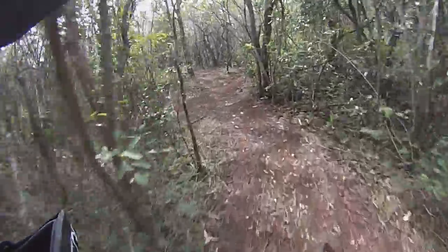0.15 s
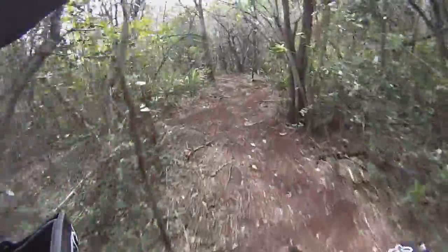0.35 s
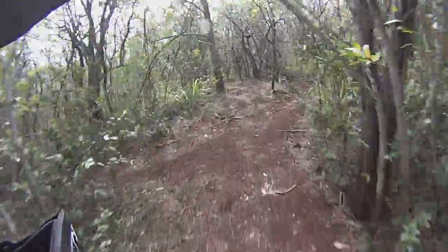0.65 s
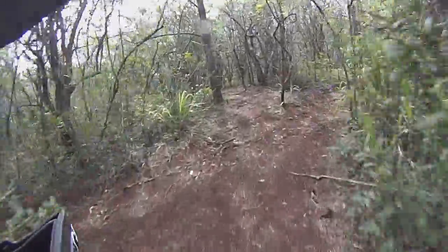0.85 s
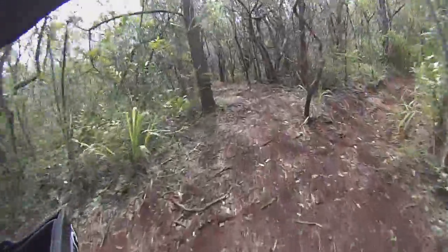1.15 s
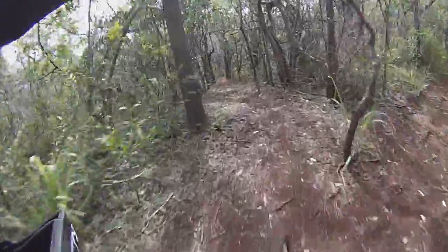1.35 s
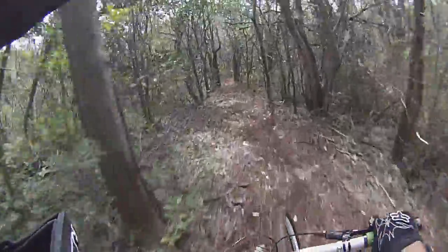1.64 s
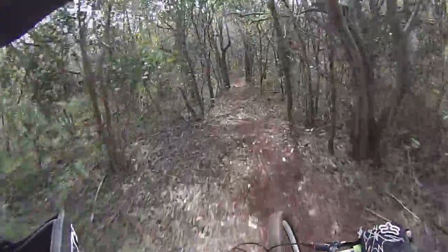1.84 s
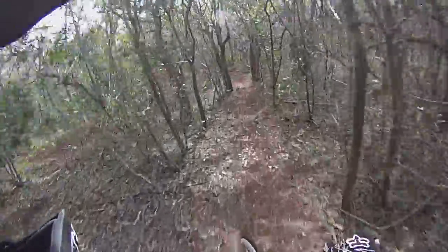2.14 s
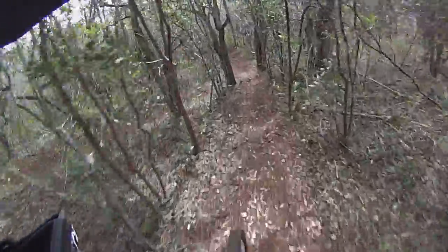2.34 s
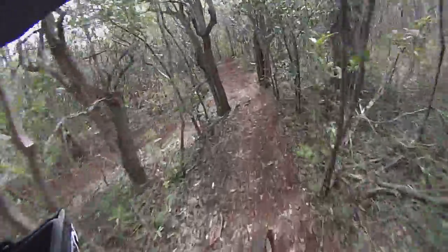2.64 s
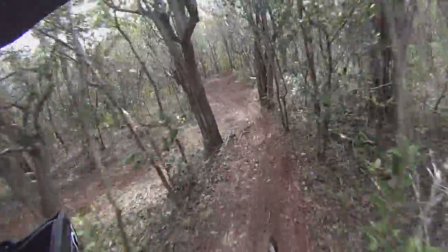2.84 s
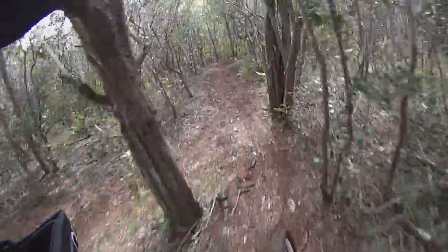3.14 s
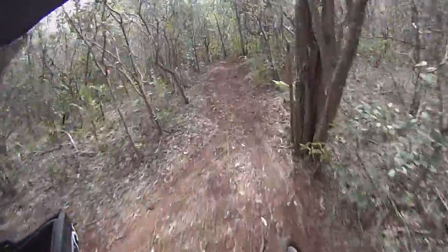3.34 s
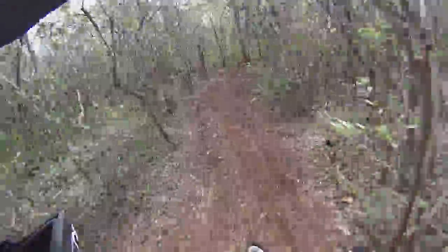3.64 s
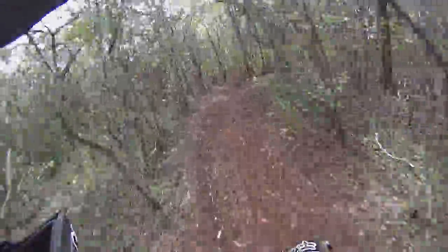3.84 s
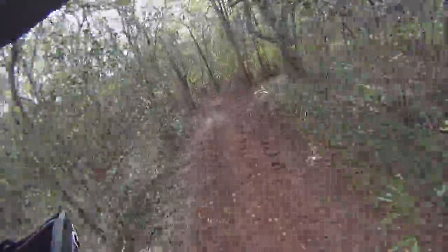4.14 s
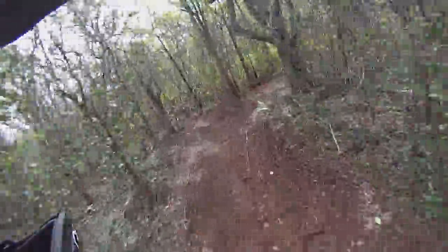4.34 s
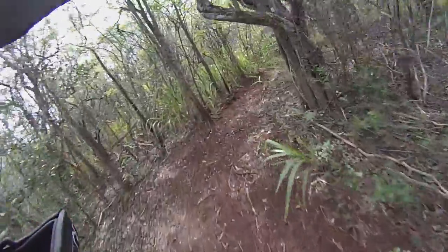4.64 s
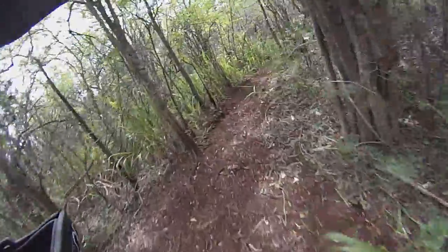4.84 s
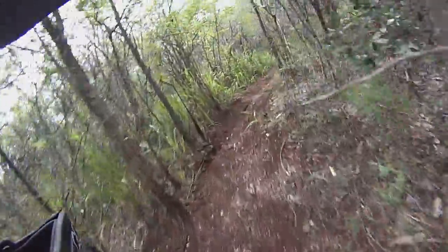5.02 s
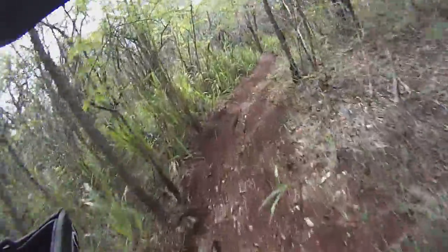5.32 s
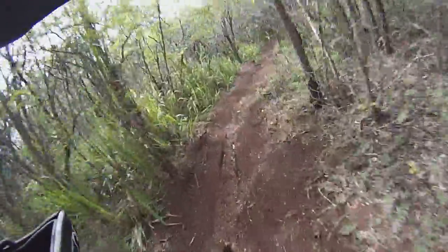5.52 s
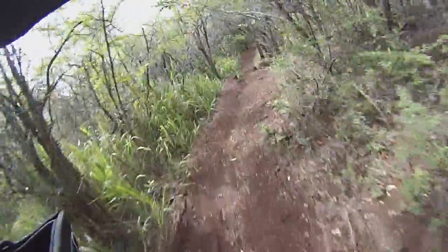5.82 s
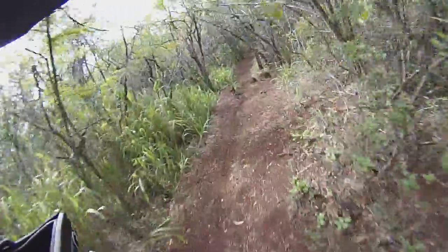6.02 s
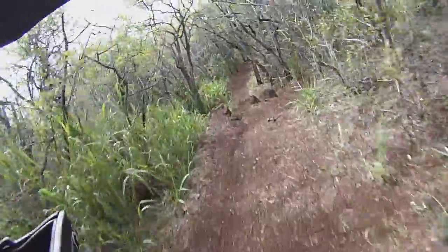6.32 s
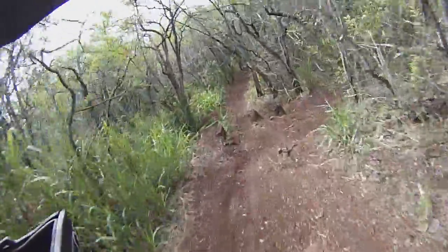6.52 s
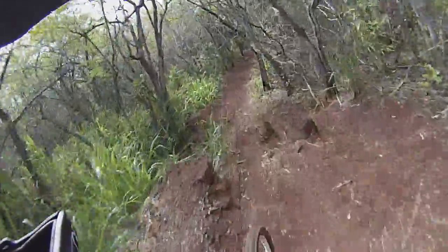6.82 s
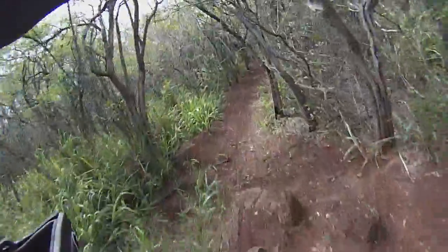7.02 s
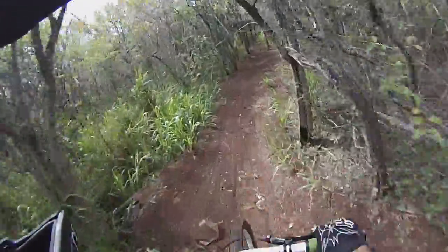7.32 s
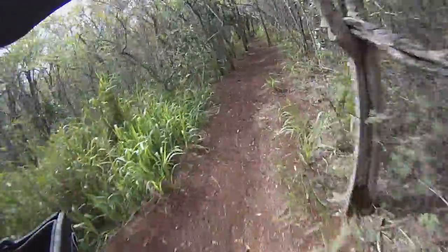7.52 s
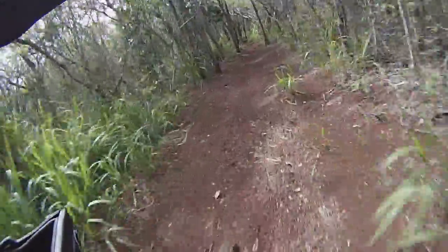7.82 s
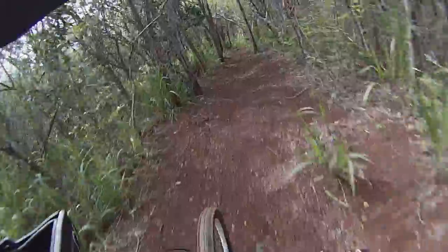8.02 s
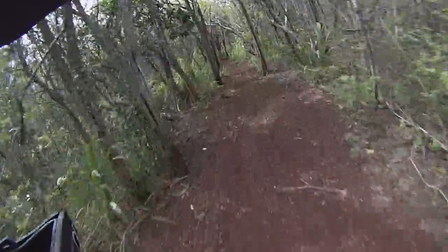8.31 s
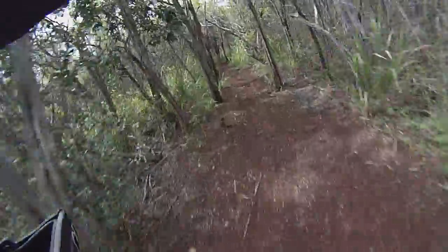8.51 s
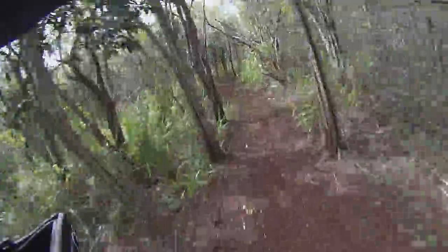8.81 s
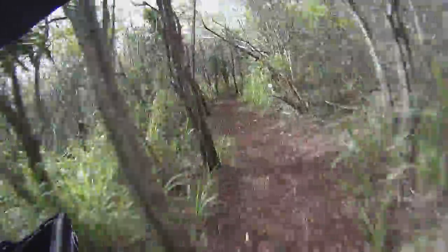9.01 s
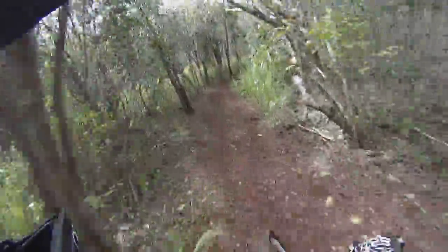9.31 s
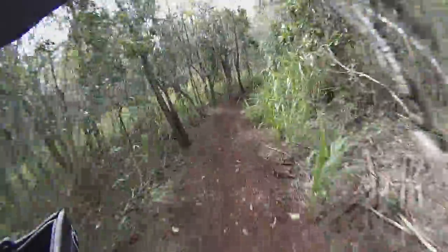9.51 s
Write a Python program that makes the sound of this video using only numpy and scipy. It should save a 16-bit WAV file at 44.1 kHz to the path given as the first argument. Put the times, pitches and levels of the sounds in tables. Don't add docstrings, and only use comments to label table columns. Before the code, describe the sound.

Muffled bike ride over dirt: low wind thumps, soft tyre hiss, a bright twig crack early, then bursts of rattling, pinging and hollow knocks.

```python
import sys
import numpy as np
from scipy import signal
from scipy.io import wavfile
from scipy.ndimage import uniform_filter1d, map_coordinates

SR = 44100
rng = np.random.default_rng(int(sys.argv[2]) if len(sys.argv) > 2 else 0)


def wav_out(sig):
    wavfile.write(sys.argv[1], SR, np.round(np.clip(np.atleast_2d(sig).T, -1, 1) * 32767).astype(np.int16))


def field_ratio(decibels):
    return 10 ** (np.asarray(decibels, dtype=float) / 20)


N = 426006
TIME_S = np.arange(N) / SR

# t/s, level/dB
GUSTS = [(0, -44), (.6, -38.5), (1.3, -40.5), (2.3, -44), (2.7, -33), (3.5, -33), (4.4, -42), (4.95, -44.5),
         (5.15, -35), (6.2, -33), (6.45, -39.5), (7.1, -35.5), (7.65, -41.5), (8.1, -33.5), (8.6, -44.5),
         (8.8, -35.5), (9.55, -32), (9.66, -34.5)]
# centre/s, length/s, gain/dB
BUFFETS = [(0.047, 0.23, 12), (.35, .14, 8), (0.502, 0.18, 11), (0.69, 0.14, 2.5), (1.665, 0.65, 10.5),
           (1.993, 0.11, 10.5), (2.26, 0.15, 7), (2.82, 0.2, 7.5), (3.05, 0.16, 4.5), (3.446, .2, -1.5),
           (4.125, 0.12, 5.5), (4.308, 0.18, 2.5), (4.696, 0.19, 12), (4.824, .12, 13), (5.225, 0.33, 9.5),
           (5.9, 0.26, 2.5), (6.386, 0.045, 10.5), (6.62, 0.45, 12.5), (6.823, 0.23, 6), (6.997, 0.13, 6.5),
           (7.208, 0.1, 13), (7.311, 0.21, 15), (7.48, 0.13, 8), (7.838, 0.22, 22), (8.433, 0.14, 9.5),
           (8.853, 0.36, 3), (9.283, 0.15, 17.5), (9.527, 0.24, 5.5)]
# t/s, level/dB
GROUND = [(0.0, -55), (0.86, -52), (1.56, -53), (1.91, -52), (2.36, -56.5), (2.91, -53.5), (3.93, -54),
          (4.14, -55), (4.79, -60), (5.22, -52), (6.32, -50.5), (7.02, -49), (7.61, -44.5), (7.78, -41.5),
          (8.07, -46), (8.93, -46), (9.36, -44.5), (9.66, -45)]
# t/s, level/dB
RUSTLE = [(0.0, -55.5), (0.46, -70), (0.8, -62.5), (2.28, -64.5), (2.88, -52), (4.2, -61), (4.6, -58),
          (4.76, -63), (5.41, -51.5), (5.85, -52.5), (6.16, -50.5), (6.29, -61), (6.51, -53), (6.91, -62),
          (7.61, -56.5), (7.8, -43.5), (8.39, -57), (9.66, -52.5)]

# f/Hz, level/dB
WIND_SLOPE = [(5, -11), (12, -18.5), (24, -3), (36, -11.5), (50, -20.5), (90, -36.5), (200, -57),
              (600, -93), (1500, -130)]
MOUNT_SLOPE = [(20, -30), (45, -2), (70, -6), (100, -30.5), (300, -63), (1000, -120)]
HISS_SLOPE = [(1000, -3), (11000, -8), (15000, -16), (15400, -48)]
SHAKE_SLOPE = [(60, -12), (110, -2.5), (220, -6), (450, -13), (700, -23.5), (1000, -31), (2000, -54),
               (8000, -104)]
ROLL_SLOPE = [(300, -22.5), (800, -17), (1100, -18), (1700, -9.5), (2100, -6), (2700, -9.5), (3300, -20.5),
              (5600, -29.5), (5900, -32.5), (12000, -53), (15000, -66), (15400, -106)]
FIZZ_SLOPE = [(900, -5.5), (1800, -2), (2600, 6), (3300, -5.5), (5000, -4.5), (5900, -8), (7400, -6.5),
              (8500, -18), (10000, -24), (12000, -35), (15000, -37), (15400, -77)]
CRACK_SLOPE = [(200, -60), (700, 11), (2500, 9), (5500, -20), (7000, -29), (15000, -45)]
SCUFF_SLOPE = [(80, -31.5), (180, -1.5), (280, 3), (500, -8.5), (1100, -17.5), (2500, -67.5)]
SNAP_SLOPE = [(600, -26), (1250, 0), (2700, 5.5), (4200, 7), (5100, -7), (6100, 5), (10000, -10),
              (11200, 4), (13500, -15), (16000, -25), (16600, -70)]

# f/Hz, width/Hz, level over slope/dB
SHAKE_PEAKS = [(165.6, 9.2, 7), (376.8, 19.4, 11), (537, 24, 4.5), (884, 166, 8.5)]
ROLL_PEAKS = [(1413, 143, 16.97), (1188, 173, 10.4), (3490, 85, 9.2), (4250, 95, 6.2), (5220, 720, 6.9)]
FIZZ_PEAKS = [(2160, 220, 3.8), (3200, 170, 2.6), (4770, 240, 1.2), (6430, 390, 3.6), (7320, 260, 4.5),
              (11040, 430, 12)]

# f/Hz, level/dB, t60/s
THUD_MODES = [(292, 1.5, 0.039), (375.2, 5.5, 0.089), (486, -1.5, 0.049), (730, -19, 0.012)]
BOUNCE_MODES = [(55.35, 0, 0.28)]
BOOM_MODES = [(172, 11, 0.11), (208, -29, 0.024)]
SHELL_MODES = [(843, 0, 0.03), (1183, 6, 0.012), (1327, 12.5, 0.027)]
UPPER_MODES = [(2024, 10, 0.02), (2440, -4, 0.0069), (2800, -13, .012), (3450, -11, 0.011),
               (4000, -29, 0.0093), (4300, -16, 0.015), (5050, -17, .014)]
SPLINTER_MODES = [(4500, 0, .12), (4334, -5, .05)]

# t/s, level/dB
SLAPS = [(0.6759, -41.5), (0.774, -40.5), (1.147, -42), (2.2179, -52), (2.722, -40), (2.98, -25.5),
         (3.136, -41), (3.379, -37.5), (3.555, -42.5), (3.764, -37.5), (5.2205, -40), (5.2574, -37),
         (5.4186, -40), (5.503, -45), (5.556, -38.5), (5.6615, -38), (5.8573, -39.5), (6.0185, -32),
         (6.1177, -38), (6.1684, -36), (6.5277, -39), (6.565, -35.5), (7.794, -38), (7.8246, -24.5),
         (7.856, -27.5), (7.927, -32.5), (8.1387, -36), (8.9477, -34.5), (9.077, -37), (9.583, -36.5)]
# t/s, level/dB
SWISHES = [(2.6524, -47), (2.96, -43), (3.2201, -50), (3.321, -41.5), (3.4007, -40), (3.466, -43),
           (3.687, -41), (4.568, -51), (4.7835, -47), (5.015, -47), (5.382, -38), (5.6027, -41),
           (5.731, -36.5), (5.782, -32), (5.9436, -45), (6.0706, -47), (6.2238, -42), (6.276, -39),
           (6.3066, -39.5), (6.5051, -42), (6.67, -38.5), (6.73, -45), (8.0611, -37), (8.2581, -46),
           (8.2935, -43), (9.2224, -41), (9.365, -34), (9.395, -38), (9.442, -30), (9.506, -34)]
# t/s, length/s, level/dB
SKIDS = [(2.655, 0.12, -55.5), (2.97, 0.061, -52.5), (4.557, 0.096, -57.5), (4.68, 0.072, -63),
         (5.262, 0.074, -46.5), (5.927, 0.091, -44), (6.01, 0.038, -47), (7.74, 0.2, -50),
         (9.345, 0.099, -55)]
# t/s, level/dB, f/Hz
CLINKS = [(2.722, -39, 2750), (2.9822, -41, 2720), (3.013, -35, 2590), (3.38, -42, 2660),
          (2.867, -46, 2750), (5.385, -41, 2600), (5.734, -40, 2700), (5.862, -47, 2700), (6.02, -39, 2210)]
# t/s, level/dB
TICKS = [(0.05, -56), (0.1106, -66), (0.492, -57.5), (0.5891, -58), (0.9637, -58), (1.061, -58),
         (1.1573, -70), (1.251, -58), (1.3553, -63), (1.476, -57), (1.9734, -61), (2.0383, -59),
         (2.2164, -59), (2.574, -61), (4.0652, -56), (4.5261, -60), (8.9894, -64), (9.0994, -59)]
# t/s, level/dB, f/Hz
PINGS = [(2.6522, -47, 4580), (2.7041, -40, 6660), (2.7226, -40, 5070), (2.8488, -46, 6380),
         (2.9141, -46, 4760), (2.96, -40, 4780), (2.982, -38, 5160), (2.983, -32, 4900),
         (3.1037, -45, 4030), (3.1356, -49, 4770), (3.2204, -46, 4770), (3.3222, -46, 4820),
         (3.3796, -41, 7600), (3.4005, -39, 4200), (3.4728, -55, 5260), (3.4728, -52, 4120),
         (3.5562, -51, 5080), (3.6904, -39, 5100), (3.7407, -41, 4300), (3.7662, -43, 7100),
         (4.5669, -48, 4490), (4.5674, -43, 4600), (4.7834, -51, 5030), (5.2209, -38, 5100),
         (5.2343, -24.5, 4300), (5.2573, -34, 4420), (5.3481, -45, 4180), (5.369, -39, 4170),
         (5.384, -42, 4240), (5.4184, -45, 4740), (5.4823, -41.5, 6240), (5.5022, -39, 4720),
         (5.5561, -42, 4790), (5.5826, -39, 5100), (5.6035, -30.5, 4330), (5.6619, -47, 4400),
         (5.7292, -42, 4200), (5.7342, -40, 4220), (5.7846, -45, 3970), (5.7846, -42, 7300),
         (5.8589, -39, 6400), (5.9303, -42, 4740), (5.9422, -30, 7030), (6.0201, -29.5, 6700),
         (6.0704, -39, 4510), (6.1188, -36, 5200), (6.1473, -44, 4270), (6.1682, -44, 4150),
         (6.2236, -42, 5140), (6.2505, -44, 5070), (6.278, -42, 5550), (6.3074, -36, 4430),
         (6.5055, -49, 6330), (6.5284, -49, 5950), (6.5284, -43, 6200), (6.5523, -40, 4680),
         (6.5668, -42, 4070), (6.6706, -40, 6500), (6.7025, -41, 7010), (6.7319, -39, 4560),
         (7.7692, -37, 4950), (7.7896, -33, 6620), (7.7961, -31, 4200), (7.8265, -30, 7520),
              (7.857, -33, 4060), (7.929, -38, 6160), (7.9672, -38, 5030), (8.0041, -41, 6460),
              (8.0281, -45, 4870), (8.061, -46, 3970), (8.061, -39, 4780), (8.1214, -40, 7500),
              (8.1413, -37, 5070), (8.2581, -43, 4230), (8.2935, -44, 4300), (8.3948, -45, 4800),
              (8.8023, -47, 4460), (8.9495, -37, 4720), (8.9864, -49, 5090), (9.0612, -45, 4640),
              (9.0777, -44, 5490), (9.133, -46, 5100), (9.152, -44, 7530), (9.2229, -41, 4000),
              (9.2229, -43, 7640), (9.2713, -44, 4360), (9.3516, -46, 4000), (9.3526, -33, 4150),
              (9.3665, -32, 4660), (9.3972, -31, 7460), (9.4454, -33, 5150), (9.5097, -47, 3970),
              (9.5097, -34, 5540), (9.5835, -42, 5030), (9.617, -47, 4800), (9.6409, -50, 4190)]
# t/s, level/dB, f/Hz
LURCHES = [(3.737, -37, 94.5), (5.35, -32, 215), (5.425, -43, 530), (5.775, -32, 215), (6.558, -34, 377),
           (7.238, -32.5, 378), (7.581, -44, 105), (7.80, -28, 280), (9.258, -27.5, 120)]
# t/s, blow/dB, hardness/dB, thinness/dB
STONES = [(0.395, -37.5, -25, 0.5), (0.618, -38.5, -14, -1), (2.443, -35, -22, 4), (2.55, -32, -13.5, 9),
          (2.832, -28.5, -16.5, 1), (2.909, -29, -7, 2.5), (3.172, -31, -12, 6), (3.319, -36, -14, 8),
          (3.624, -32.5, -15, 4), (4.262, -40, -28, 5.5), (5.072, -29.5, -12.5, 12), (9.353, -25, -2.5, 4)]
# t/s, blow/dB, heft/dB, hardness/dB, hollowness/dB
ROOTS = [(2.963, -37, 3.5, -22, -7), (3.734, -29.5, -2.5, -17.5, -2), (5.233, -24, 1, 4, 1),
         (5.343, -27.5, 8.5, -14, 7.5), (5.425, -36.5, -2, -25, -6), (5.495, -50, 13, -19, 3),
         (5.582, -26, -11, 2.5, 1), (5.602, -27, 6.5, -14, -2), (5.771, -25.5, 1.5, -19, -1),
         (5.794, -27, -23, -16, -4), (6.556, -32.5, 2, -27, 6), (7.236, -31.5, 2, -32, 6),
         (7.428, -44.5, 7, -15, -3), (7.762, -26.5, -5, -34, -8), (7.798, -31, -2, -22, 1),
         (7.825, -21.5, 0, -12, -1.5), (7.856, -26, 0, -7.5, -9), (7.901, -31, -2, -14, -12),
         (7.931, -43, 9, 8.5, 8.5), (8.008, -33, -0.5, -10, -2), (9.009, -37.5, 5, -6, -1),
         (9.261, -33, 2, -30, -2), (9.271, -35.5, 11.5, -1, 0), (9.442, -26.5, -11, -4, 5.5)]
# t/s, level/dB
TWIG = [
    (1.5655, -17),
    (1.5715, -17),
]


def evened(x):
    return x / np.sqrt(np.mean(x ** 2) + 1e-20)


def curve(rows, follows=1, mid_db=0):
    t_s, level_db = np.transpose(rows)
    return field_ratio(follows * (np.interp(TIME_S, t_s, level_db) - mid_db))


def add(mix, start_s, sound):
    part = mix[round(start_s * SR):][:len(sound)]
    part += sound[:len(part)]


def decay(t, t60_s, rise_s):
    return field_ratio(-60 * t / t60_s) * (1 - np.exp(-t / rise_s))


def coloured(x, slope, peaks=()):
    hz = abs(np.fft.fftfreq(16384, 1 / SR)) + 1
    slope_hz, slope_db = np.transpose(slope)
    gain = field_ratio(np.interp(np.log(hz), np.log(slope_hz), slope_db))
    for centre_hz, width_hz, peak_db in peaks:
        gain = gain * (1 + (field_ratio(peak_db) - 1) / (1 + (2 * (hz - centre_hz) / width_hz) ** 2))
    spectrum = np.exp(np.conj(signal.hilbert(np.log(gain))))
    taps = np.fft.ifft(spectrum).real[:12000]
    return evened(signal.oaconvolve(x, taps)[:len(x)])


def slow_noise(per_s):
    size = max(int(SR / per_s), 2)
    return evened(uniform_filter1d(uniform_filter1d(rng.standard_normal(N), size), size))


def lumps(per_s, depth_db):
    return field_ratio(depth_db * slow_noise(per_s))


def grit(per_s, spread_db):
    size = field_ratio(spread_db * np.minimum(rng.exponential(1, N), 4)) * rng.choice([-1, 1], N)
    return evened(size * (rng.random(N) < per_s / SR))


def patchy(x, depth_db):
    z = signal.stft(x, nperseg=128)[2]
    cells = uniform_filter1d(rng.standard_normal(z.shape), size=5, axis=0)
    cells = uniform_filter1d(cells, size=5, axis=1)
    return evened(signal.istft(z * field_ratio(depth_db * evened(cells)), nperseg=128)[1][:len(x)])


def ring(modes, detune, rise_s, sag=0):
    t = np.arange(int(.3 * SR)) / SR
    settle_s = 0.0032
    bent = detune * (t + sag * settle_s * (1 - np.exp(-t / settle_s)))
    x = sum(field_ratio(db - 60 * t / t60_s) * np.sin(2 * np.pi * hz * bent) for hz, db, t60_s in modes)
    x = x * (1 - np.exp(-t / rise_s)) ** (2 if sag else 1)
    return x / abs(x).max()


def wavering(x, per_s, pitch_share):
    shift = slow_noise(per_s)
    shift = shift * pitch_share / np.std(np.gradient(shift))
    return map_coordinates(x, [np.arange(N) + shift], order=1, mode="nearest")


def vent_hiss():
    return field_ratio(-71.5) * coloured(rng.standard_normal(N), HISS_SLOPE)


def wind():
    push = coloured(rng.standard_normal(N), WIND_SLOPE)
    push = push / (uniform_filter1d(push ** 2, size=5000) + 0.054) ** 0.35
    bob = coloured(rng.standard_normal(N), MOUNT_SLOPE, [(58, 16, 3.5)])
    buffet_db = np.zeros(N)
    for centre_s, length_s, gain_db in BUFFETS:
        phase = np.clip((TIME_S - centre_s) / length_s, -.5, .5)
        buffet_db += gain_db * np.cos(np.pi * phase) ** 2
    bob_db, follows, gust_mid_db = -47, 0.86, -33.5
    bobbing = field_ratio(bob_db + follows * buffet_db) * curve(GUSTS, follows, gust_mid_db) * bob
    return field_ratio(2.0 + buffet_db) * curve(GUSTS) * evened(push) + bobbing


def frame_shake():
    drive = (rng.standard_normal(N) + 0.42 * grit(60, 3.2)) * lumps(19, 2.4)
    gain = field_ratio(-48.5) * curve(GROUND, follows=0.79, mid_db=-51)
    return gain * coloured(drive, SHAKE_SLOPE, SHAKE_PEAKS)


def tyres():
    drive = (rng.standard_normal(N) + .3 * grit(300, 3.)) * lumps(60, .7)
    return field_ratio(1.1) * curve(GROUND) * coloured(drive, ROLL_SLOPE, ROLL_PEAKS)


def rustle():
    drive = (rng.standard_normal(N) + 0.34 * grit(500, 1.1)) * lumps(80, 1.66)
    return field_ratio(-5.0) * curve(RUSTLE) * patchy(coloured(drive, FIZZ_SLOPE, FIZZ_PEAKS), 4.8)


def rattles():
    force, t = np.zeros(N), np.arange(4096) / SR
    fizz = coloured(0.78 * rng.standard_normal(N) + grit(1800, 2.9), FIZZ_SLOPE, FIZZ_PEAKS)
    for rows, t60_s in ((SLAPS, .042), (SWISHES, 0.11)):
        for start_s, level_db in rows:
            add(force, start_s, field_ratio(level_db) * decay(t, t60_s, 0.08 * t60_s))
    for start_s, length_s, level_db in SKIDS:
        add(force, start_s, field_ratio(level_db) * signal.windows.tukey(round(length_s * SR), .35))
    for start_s, level_db in TICKS:
        add(force, start_s, field_ratio(level_db + 7 - 60 * t / 0.035))
    return force * patchy(fizz, 3.6)


def clinks_and_ticks():
    out = np.zeros(N)
    for start_s, level_db, hz in CLINKS:
        add(out, start_s, field_ratio(level_db) * ring([(hz, 0, .03), (1.09 * hz, -6, .02)], 1, .001))
    for start_s, level_db in TICKS:
        tick = ring([(7730, 0, 0.0098), (6700, -10, 0.0087)], 0.99, 0.0011)
        add(out, start_s, field_ratio(level_db - 6) * tick)
    return out


def pings():
    out, t = np.zeros(N), np.arange(1200) / SR
    partials = ((1, 5), (0.74, -5), (.84, -7.5), (1.23, -9), (1.52, -15.5))
    for start_s, level_db, hz in PINGS:
        wobble = uniform_filter1d(rng.standard_normal((5, 1200)), size=30, axis=1) * np.sqrt(30)
        tones = sum(field_ratio(db) * (0.69 + w) * np.sin(2 * np.pi * hz * ratio * t)
                    for (ratio, db), w in zip(partials, wobble))
        add(out, start_s - .0015, field_ratio(level_db - 6) * decay(t, 0.025, 0.0029) * tones)
    return out


def landing():
    out = np.zeros(N)
    for start_s, level_db, hz in LURCHES:
        add(out, start_s, field_ratio(level_db) * ring([(hz, 0, .1)], 1, 0.0031))
    grind = coloured(rng.standard_normal(N), SCUFF_SLOPE)[:round(.24 * SR)]
    add(out, 7.75, field_ratio(-39) * signal.windows.tukey(len(grind), .6) * grind)
    swing_hz, swing_t60_s = 28, 0.61
    add(out, 7.772, -field_ratio(-7.5) * ring([(swing_hz, 0, swing_t60_s)], 0.93, 0.024))
    return out


def knock(out, cracks, scuffs, start_s, blow_db, heft_db, hard_db, hollow_db, thin_db, bounce_db,
          slower, scuff_db):
    t, chance = np.arange(1500) / SR, rng.uniform(-1, 1, 9)
    thud = [(hz, db + 0.5 * c + thin_db * (450 < hz < 600), t60_s)
            for (hz, db, t60_s), c in zip(THUD_MODES, chance[5:])]
    sag = 0.14 * field_ratio(blow_db + hard_db + 18.5)
    shell_db = 2 + 0.47 * hard_db + hollow_db
    # modes, level/dB, rise/s, detune spread (loose mount, firm case), sag
    parts = [(thud, 0.7, 0.00089 * slower, 0.029, 0),
             (BOUNCE_MODES, bounce_db, 0.013, 0.065, 0),
             (BOOM_MODES, heft_db, 0.001, 0.057, 0),
             (SHELL_MODES, shell_db, 0.0011, 0.014, 0),
             (UPPER_MODES, 4.0 + hard_db, 0.0009, 0.024, sag)]
    for (modes, level_db, rise_s, spread, bend), c in zip(parts, chance):
        tone = ring(modes, 1 + spread * c, rise_s, bend)
        add(out, start_s, np.sign(c) * field_ratio(blow_db + level_db) * tone)
    here = slice(round(start_s * SR), round(start_s * SR) + 1500)
    crack = cracks[here] * decay(t, 0.035, 0.0022)
    add(out, start_s, field_ratio(blow_db + hard_db - 3.0) * crack)
    scuff = scuffs[here] * field_ratio(-60 * t / 0.071) * (1 - np.exp(-t / (0.0011 * slower))) ** 2
    add(out, start_s, field_ratio(blow_db + scuff_db) * scuff)


def knocks():
    out = np.zeros(N)
    cracks = coloured(rng.standard_normal(N), CRACK_SLOPE)
    scuffs = coloured(rng.standard_normal(N), SCUFF_SLOPE)
    for start_s, blow_db, heft_db, hard_db, hollow_db in ROOTS:
        bounce_db = 4.5 + 0.035 * heft_db - 0.2 * hard_db
        knock(out, cracks, scuffs, start_s, blow_db, heft_db, hard_db, hollow_db, thin_db=0,
              bounce_db=bounce_db, slower=field_ratio(-0.43 * hard_db), scuff_db=-6.5)
    for start_s, blow_db, hard_db, thin_db in STONES:
        knock(out, cracks, scuffs, start_s, blow_db, -9, hard_db, hollow_db=-6, thin_db=thin_db,
              bounce_db=-10, slower=1, scuff_db=-7)
    return out


def twig():
    out, t = np.zeros(N), np.arange(1024) / SR
    for (start_s, level_db), t60_s in zip(TWIG, (.006, .012)):
        click = 4.1 * (abs(t - .0003) < .5 / SR)
        burst = coloured(rng.standard_normal(1024) + click, SNAP_SLOPE)
        add(out, start_s, field_ratio(level_db - 8.5 - 60 * t / t60_s) * burst)
    (first_s, first_db), (last_s, last_db) = TWIG
    add(out, first_s + 0.00274, field_ratio(first_db - 20) * ring([(2600, 0, .006)], 1, .0005))
    add(out, last_s, field_ratio(last_db - 39) * ring(SPLINTER_MODES, 1, 0.0026))
    return out


def scene():
    air = vent_hiss() + wind() * lumps(per_s=10.3, depth_db=1.6)
    hum = wavering(frame_shake() + tyres(), per_s=6.94, pitch_share=0.01216)
    loose = rustle() + rattles() + clinks_and_ticks() + pings()
    bike = air + hum + loose + landing() + knocks()
    top_end = signal.firwin(401, 15350, window=("kaiser", 9), fs=SR)
    return (signal.oaconvolve(bike, top_end, "same") + twig())[None]


def top_dropouts(x):
    hz, t, z = signal.stft(x, SR, nperseg=2048)
    luck = np.repeat(rng.random((len(hz) // 16 + 1, len(t))), 16, axis=0)[:len(hz)]
    odds = np.interp(hz, [12400, 13000, 14600, 15200], [0, .2, .3, .8])[:, None]
    whole_top = (luck[0] < .04) & (hz[:, None] > 12900)
    odds = np.where(whole_top, 1, odds)
    top = abs(z[hz > 12500]).mean(0)
    keep = (luck > odds) | (top > 4 * np.median(top))
    return signal.istft(z * keep, SR, nperseg=2048)[1][:N]


def roll_off(x):
    return signal.sosfilt(signal.butter(12, 16360, fs=SR, output="sos"), x)


def record(dry):
    mix = top_dropouts(dry[0])[None]
    return roll_off(mix)


dry = scene()
out = record(dry)
wav_out(out)
```